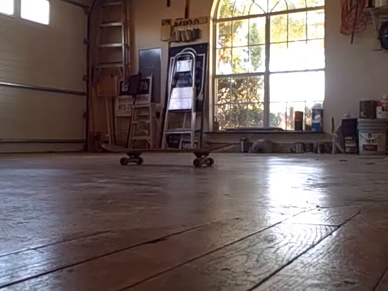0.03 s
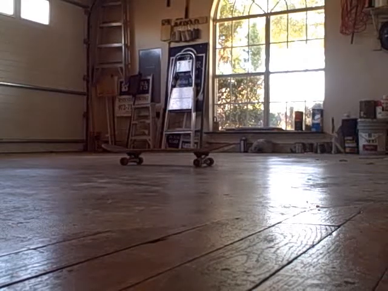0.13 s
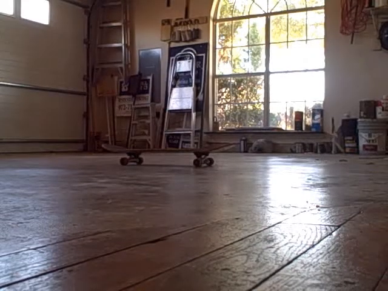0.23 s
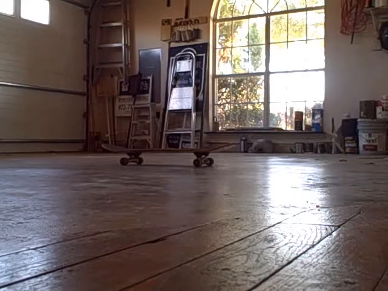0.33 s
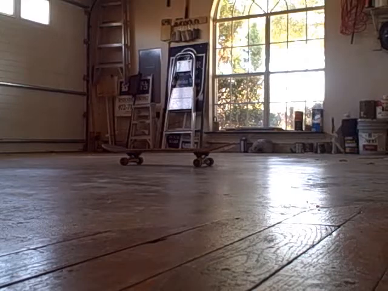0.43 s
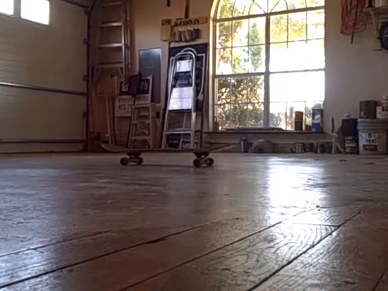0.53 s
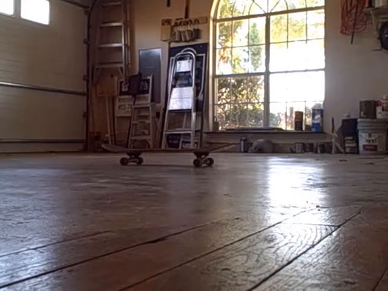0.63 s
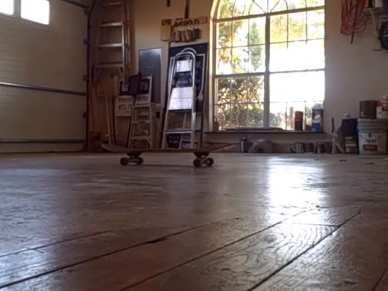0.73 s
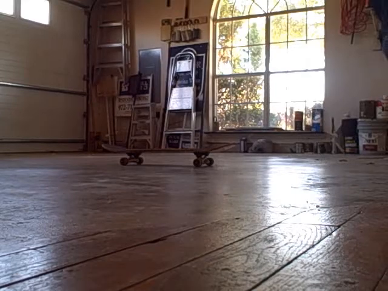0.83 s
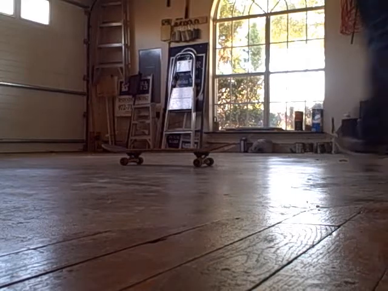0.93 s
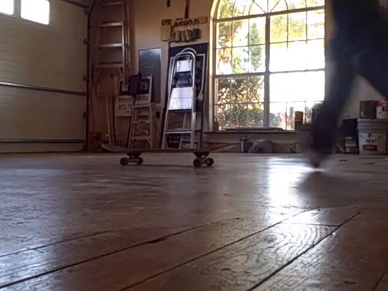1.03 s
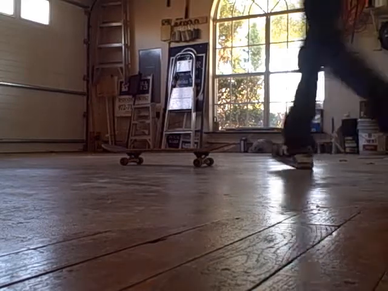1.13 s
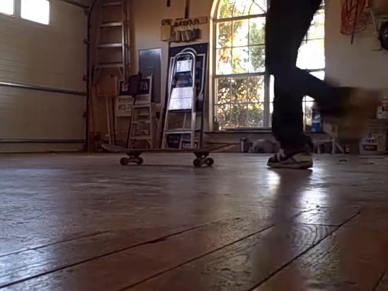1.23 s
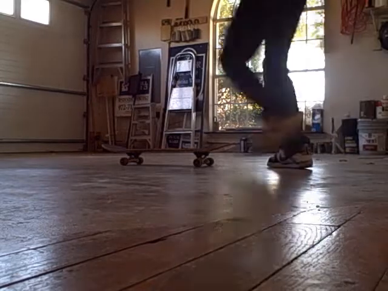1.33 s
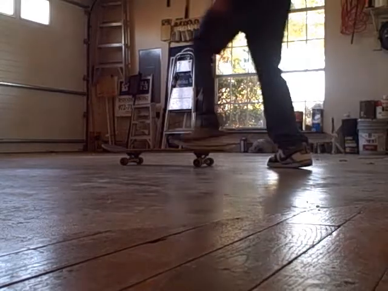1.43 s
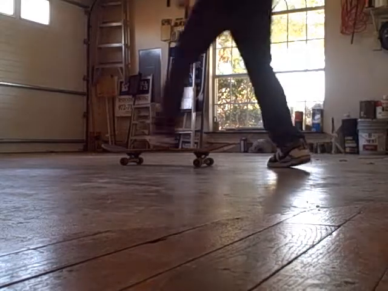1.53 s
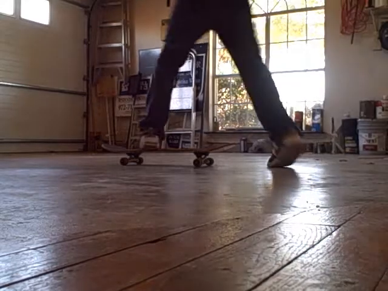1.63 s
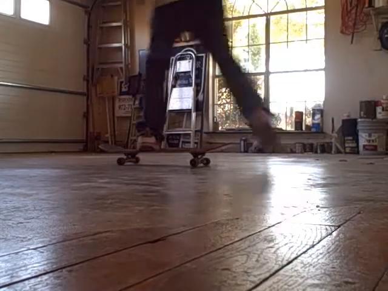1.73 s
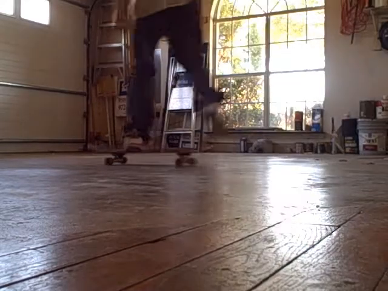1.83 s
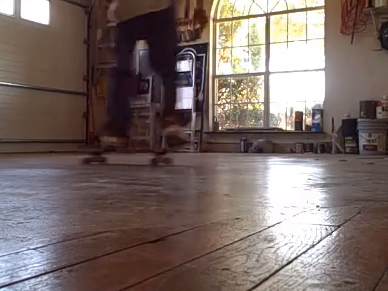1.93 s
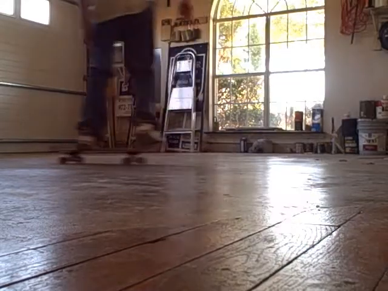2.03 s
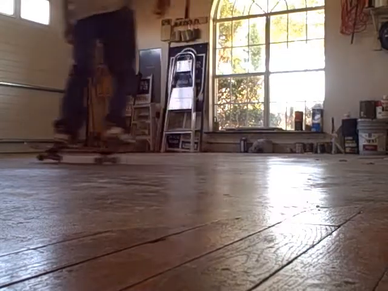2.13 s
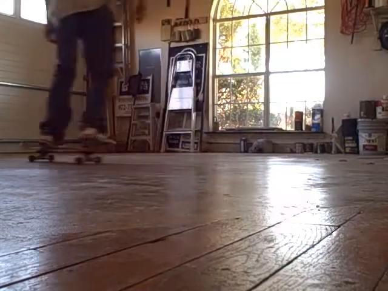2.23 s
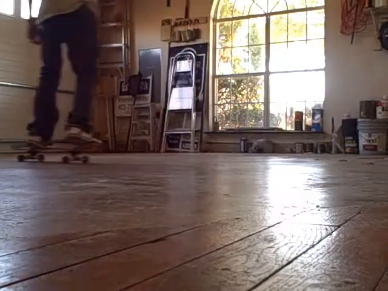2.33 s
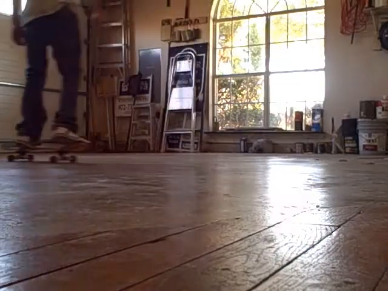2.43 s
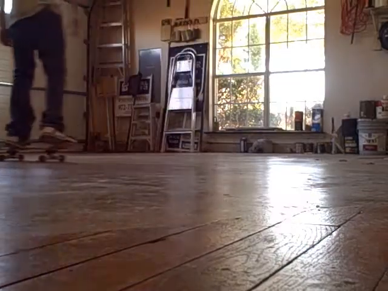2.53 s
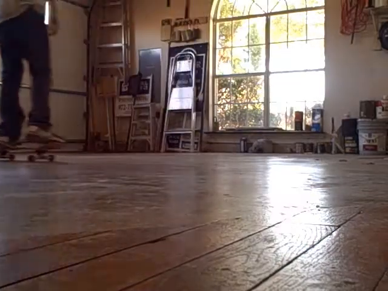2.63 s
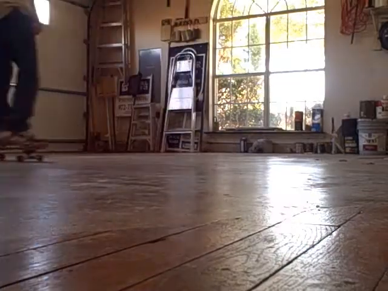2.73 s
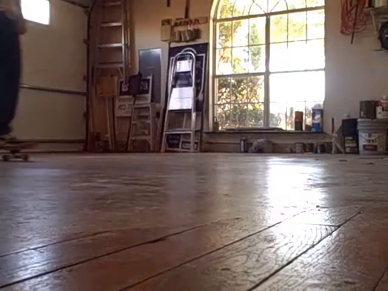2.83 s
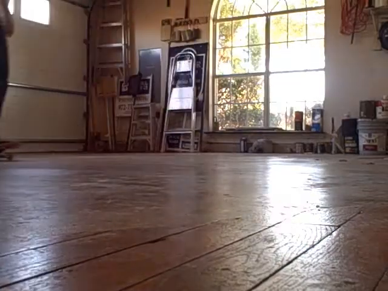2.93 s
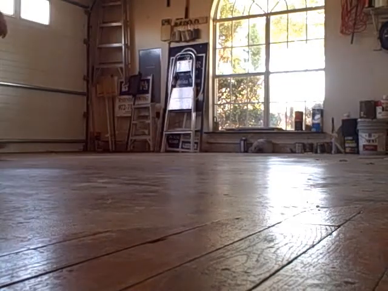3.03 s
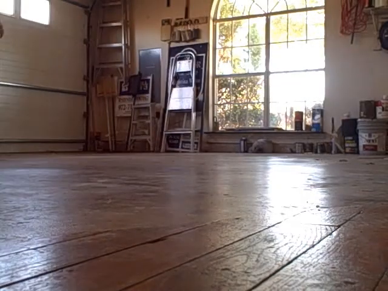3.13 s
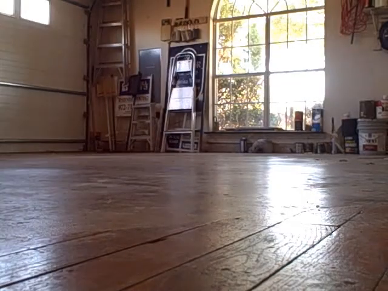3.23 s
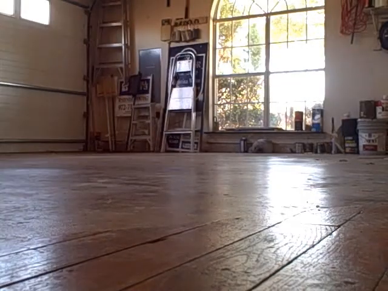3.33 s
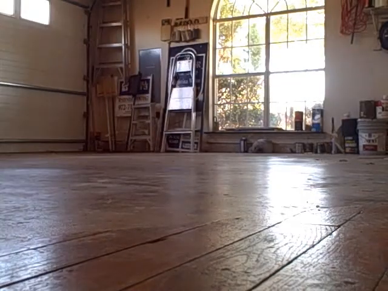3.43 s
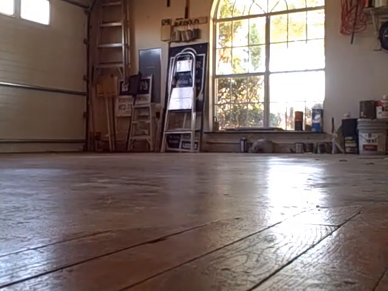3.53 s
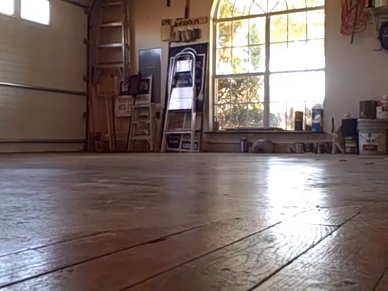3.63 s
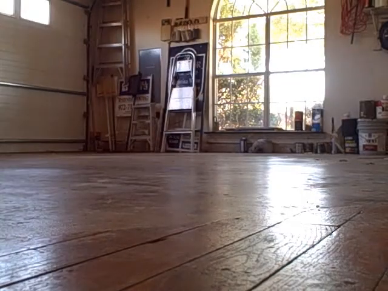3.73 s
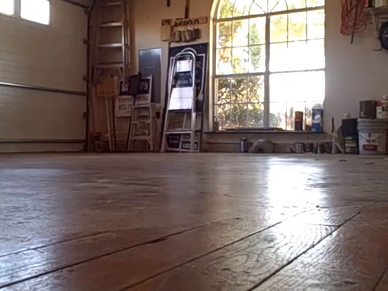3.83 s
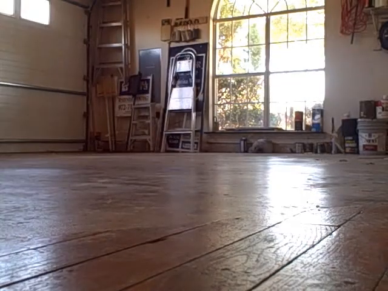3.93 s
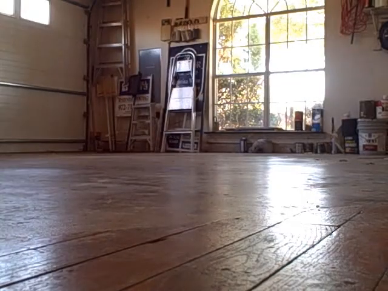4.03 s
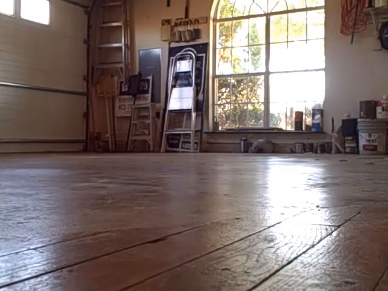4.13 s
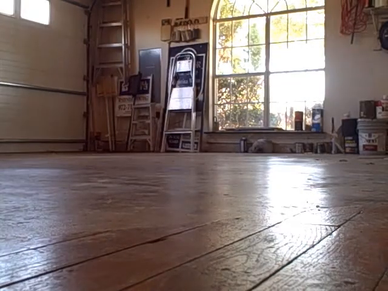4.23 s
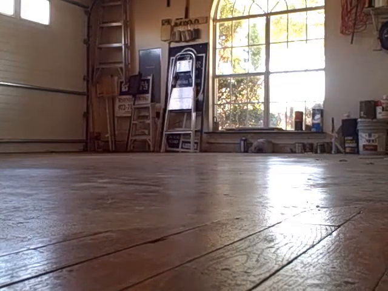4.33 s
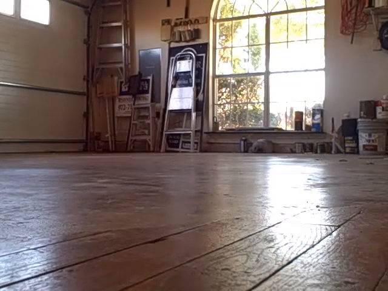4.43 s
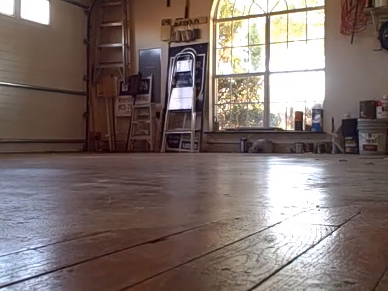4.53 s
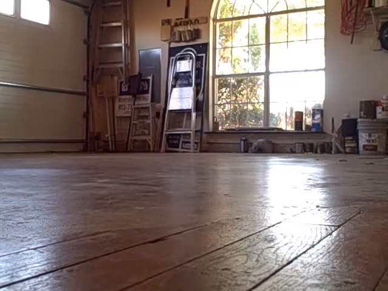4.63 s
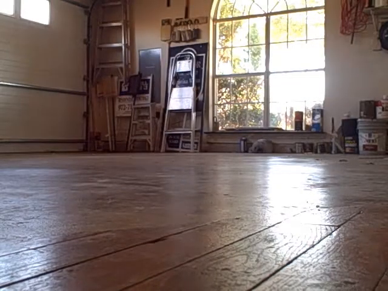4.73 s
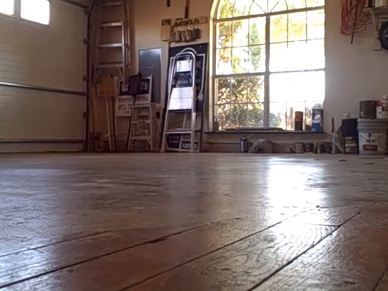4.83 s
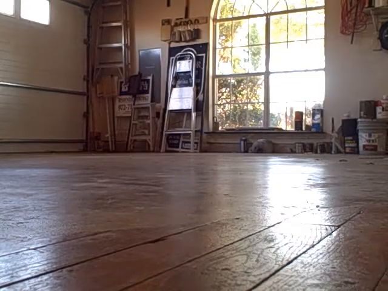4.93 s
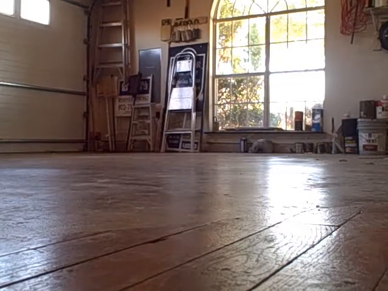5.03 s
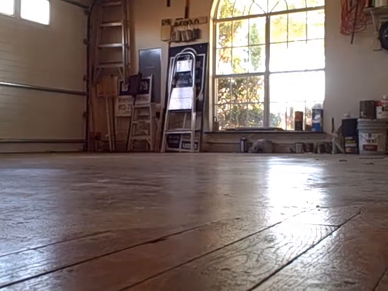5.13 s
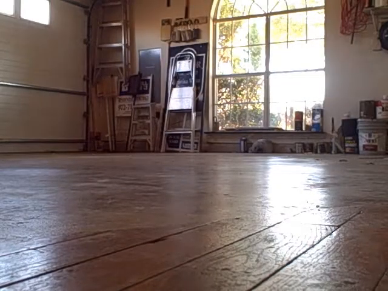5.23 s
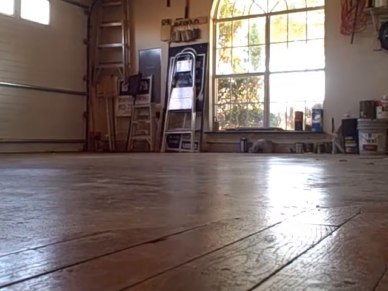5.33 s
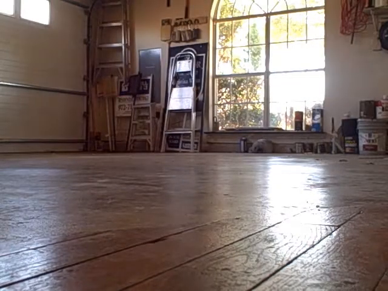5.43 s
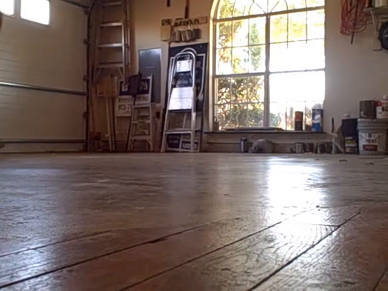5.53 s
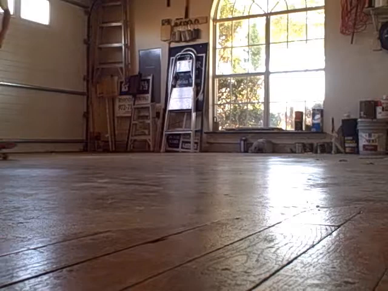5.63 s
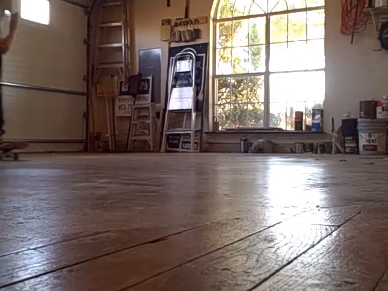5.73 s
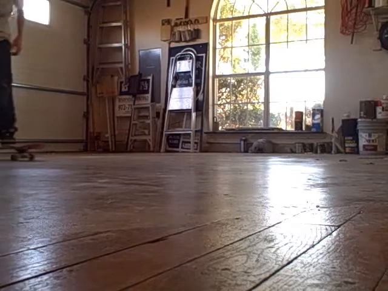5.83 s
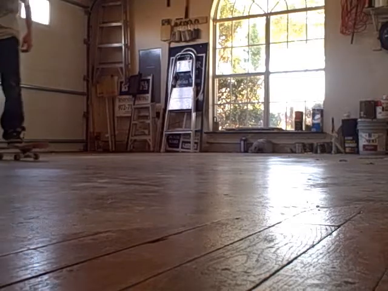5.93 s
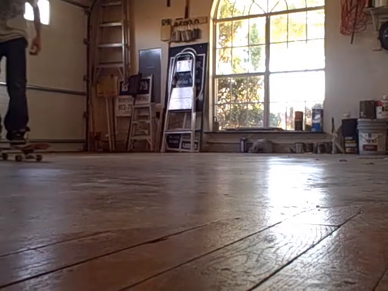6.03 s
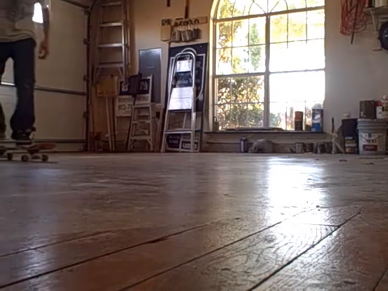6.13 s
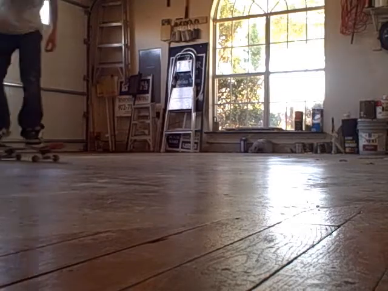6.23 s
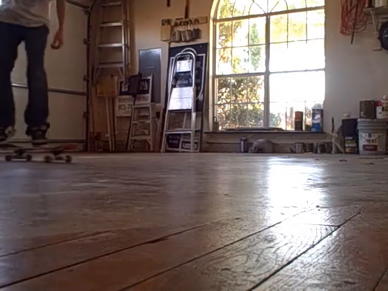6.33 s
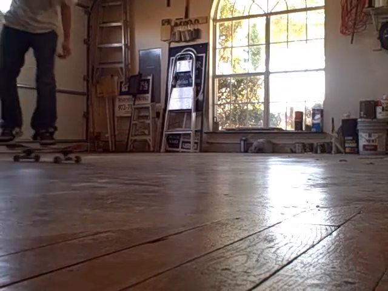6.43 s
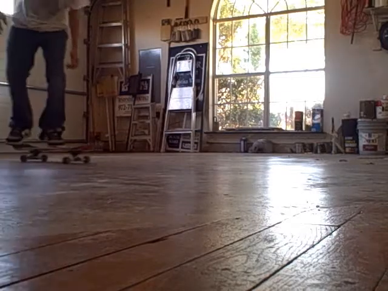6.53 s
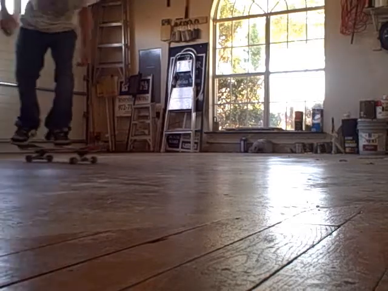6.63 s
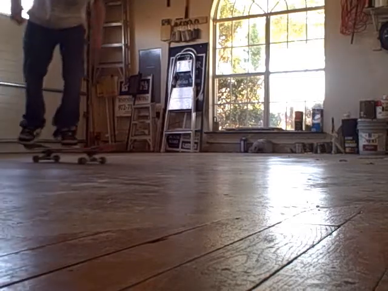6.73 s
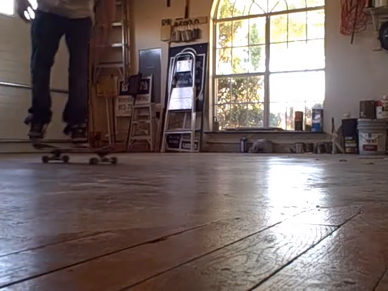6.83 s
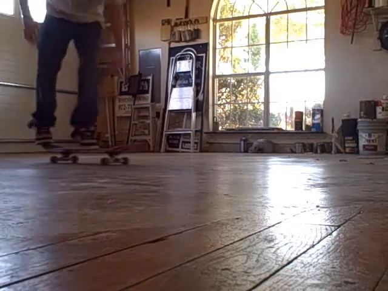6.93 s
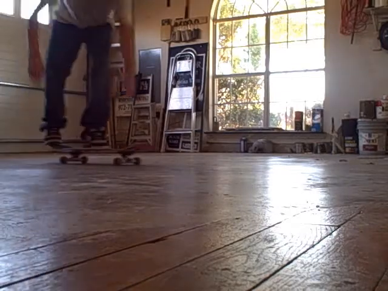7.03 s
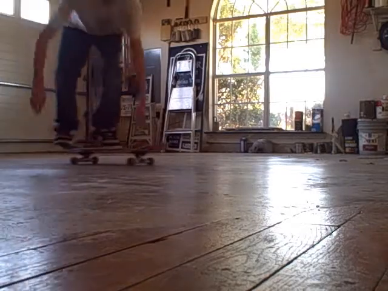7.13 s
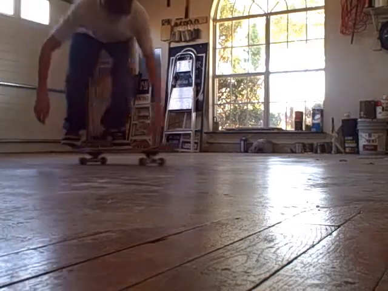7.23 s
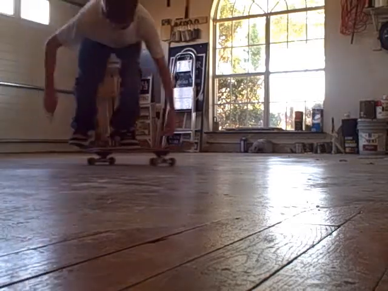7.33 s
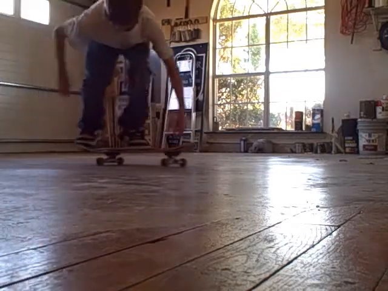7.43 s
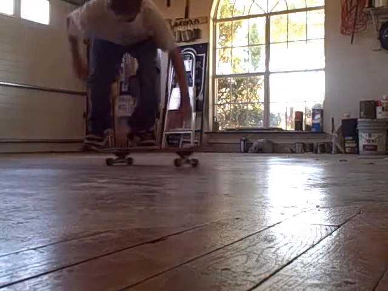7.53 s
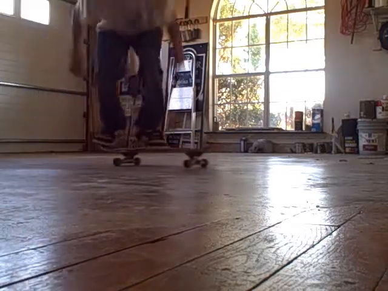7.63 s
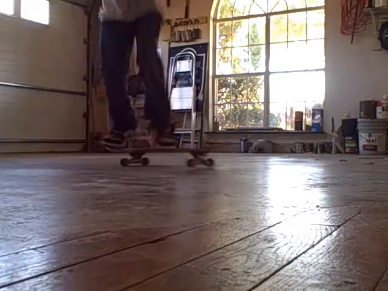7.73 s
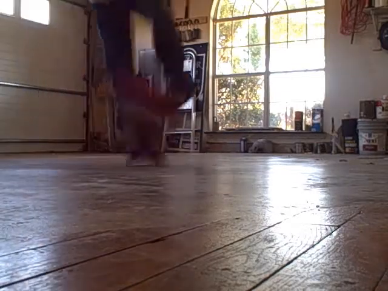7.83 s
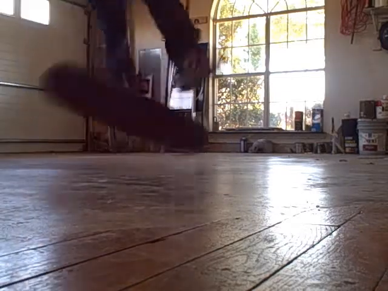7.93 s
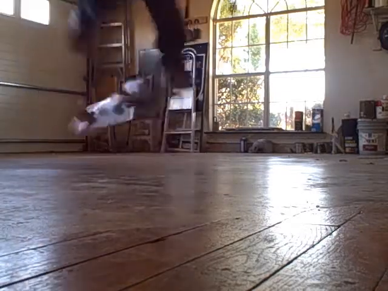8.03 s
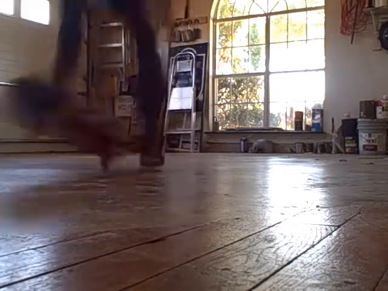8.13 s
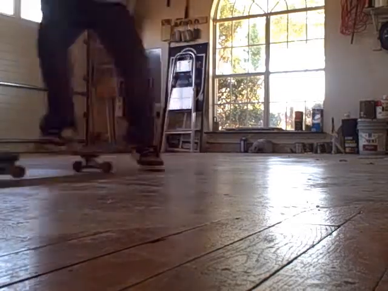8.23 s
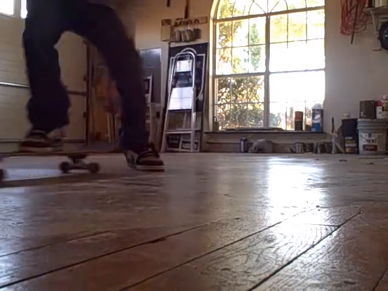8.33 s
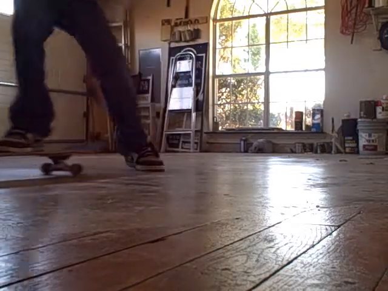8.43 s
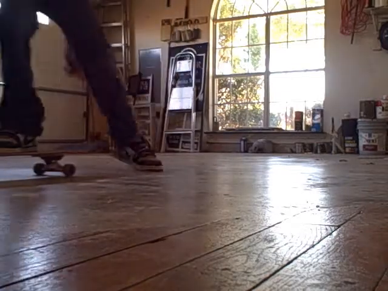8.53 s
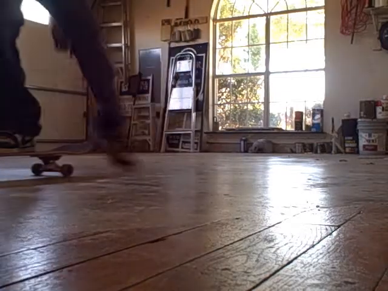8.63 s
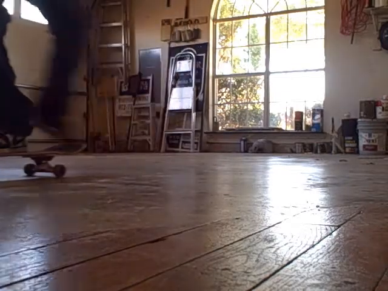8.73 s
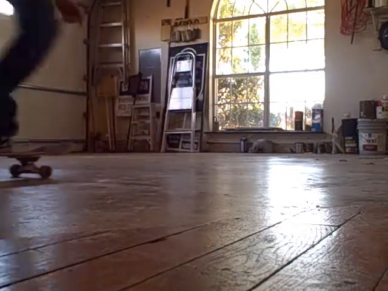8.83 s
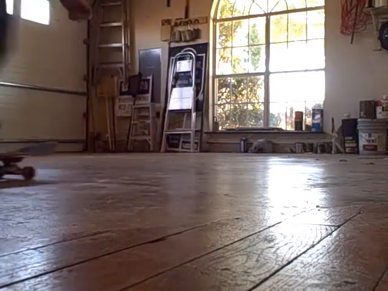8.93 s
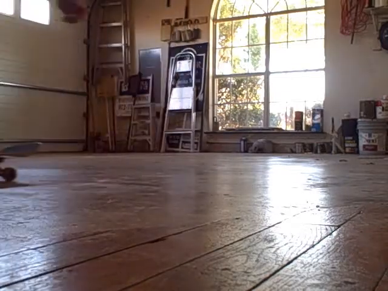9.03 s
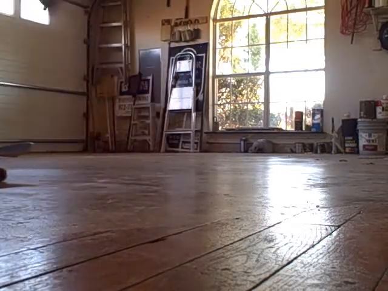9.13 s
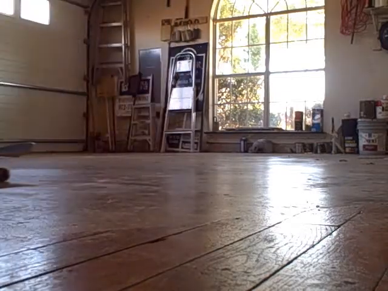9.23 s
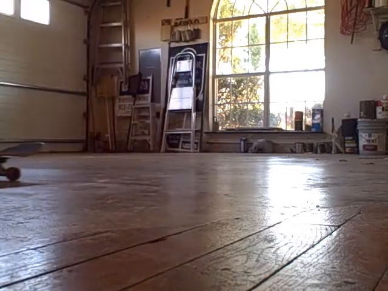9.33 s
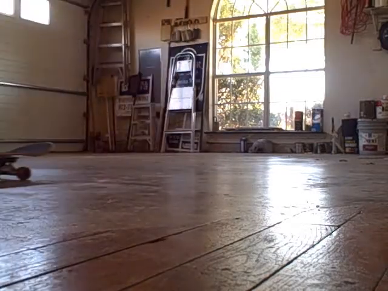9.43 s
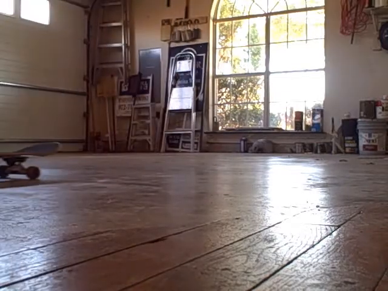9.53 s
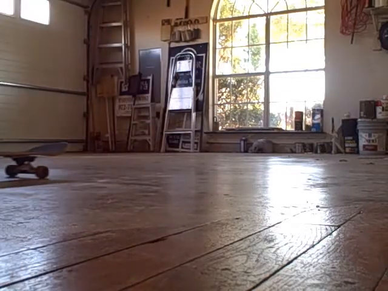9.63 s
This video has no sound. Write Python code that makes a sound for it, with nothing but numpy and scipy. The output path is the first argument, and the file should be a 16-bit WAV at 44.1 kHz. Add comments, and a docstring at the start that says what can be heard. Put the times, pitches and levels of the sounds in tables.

```python
"""Soft shoe steps and a faint engine outside, then a skateboard on the plank floor of an echoing garage.
The rider steps on, rolls away, turns with the wheels knocking down, rolls back and pops a flip.
Wood and steel are noise bursts through resonances and spectra; rolling is spiky noise with moving gains.
The deck rings as decaying sines, the engine is one sine. Blows pass through a synthetic echo.
The microphone lies on the boards; the pop and the landing overload it."""
import sys
import numpy as np
from scipy import signal
from scipy.fft import rfft, irfft, next_fast_len
from scipy.io import wavfile
from scipy.ndimage import map_coordinates

SR = 44100
rng = np.random.default_rng(int(sys.argv[2]) if len(sys.argv) > 2 else 0)


def store_pcm(level_fs):
    """Save levels as 16-bit WAV."""
    pcm = np.round(np.clip(level_fs, -1, 1) * 32767).astype(np.int16)
    wavfile.write(sys.argv[1], SR, np.atleast_2d(pcm).T)


N = 426888
TIME = np.arange(N) / SR
AGE = TIME[:2 ** 15]  # seconds since a contact
# Level columns are relative; each function trims them. Spectra give shape only.

# tail pop and landing blows: start_s, ring_db, boom_db, crack_db, crack_tilt_db_per_octave
CLACKS = [(7.9984, -11, -27.5, -13.5, 3.5), (8.279, -27, -47, -32, -6), (8.283, -34, -27, -27, 7),
          (8.2902, -5, -17, -12, -1), (8.299, -7, -20, -12.5, -6), (8.3657, -5.5, -22.5, -10, 1.5),
          (8.377, -9, -24, -15, -5)]
# modes of the deck and its trucks: pitch_hz, level_db, t60_s
DECK_MODES = [(307, -16.5, 0.19), (488.5, -16, 0.51), (540, -12, 0.21), (737.5, -5.5, 0.1),
              (810, -7.5, 0.13), (1080, -2, 0.054), (1297, -6, 0.082), (1400, -3.5, 0.06),
              (1620, 0.5, 0.052), (1614, -26.5, 1.26), (1684, -10.5, 0.09), (1945, -4, 0.055),
              (2136, -5, 0.031), (2432, -6.5, 0.045), (2850, -5, 0.021), (3000, -16, 0.042)]
# crack of the contact: freq_hz, level_db
CRACK_SPECTRUM = [(60, -40), (200, -12), (600, 3), (1500, 1.5), (2800, -0.5), (5000, -8.5), (9000, -11),
                  (10200, -21.5), (12500, -34), (13300, -64)]
# boom of the floor: freq_hz, level_db
BOOM_SPECTRUM = [(25, -24), (76, -10.5), (110, -17.5), (190, -5), (245, -2), (305, 3), (380, -2), (470, -3),
                 (650, -6), (1500, -47.5)]
# lowest mode of the sprung floor; level against the boom
FLOOR_HZ, FLOOR_DB, FLOOR_T60_S = 75, -21, 0.7


def deck_ring():
    """A struck deck rings in decaying sines; each blow finds the modes at other levels, pitches and signs."""
    ring = np.zeros(len(AGE))
    for pitch_hz, level_db, t60_s in DECK_MODES:
        level_shift, pitch_shift, polarity = rng.standard_normal(3)
        sine = np.sin(2 * np.pi * pitch_hz * (1 + 0.0082 * pitch_shift) * AGE)
        ring += amp(level_db + level_shift - 60 * AGE / t60_s) * sine * np.sign(polarity)
    return ring


def clacks():
    """Tail pop and landing: the deck rings, the contact cracks and the floor booms."""
    out = np.zeros(N)
    for start_s, ring_db, boom_db, crack_db, tilt_db in CLACKS:
        # bare wood cracks brightly, loaded wheels darkly
        tilted = [(hz, db + tilt_db * np.log2(np.clip(hz, 900, 3600))) for hz, db in CRACK_SPECTRUM]
        crack = blow(coloured(burst(0.042), tilted))
        boom = blow(coloured(burst(0.123), BOOM_SPECTRUM))
        contact = amp(crack_db) * crack + amp(boom_db) * boom
        floor = amp(boom_db + FLOOR_DB - 60 * AGE / FLOOR_T60_S) * np.sin(2 * np.pi * FLOOR_HZ * AGE)
        # the broad deck faces the microphone; the crack and the boom spread round the room
        add(out, start_s, amp(ring_db - 9) * garage(blow(deck_ring()), direct_db=5.5))
        add(out, start_s, garage(contact, direct_db=0.0))
        add(out, start_s, floor)
    return out


# bearings and truck hardware: pitch_hz, width_hz, level_db
METAL_MODES = [(7400, 900, -15), (9220, 92, 17), (9380, 50, 26), (10900, 300, -18)]
# bright rattle and hiss: freq_hz, level_db
RATTLE_SPECTRUM = [(1500, -15.5), (3800, 0), (5700, -4.5), (7200, 2), (9400, 1.5), (10200, -10),
                   (12500, -14), (13300, -20)]


def hardware(force, ring_db):
    """Steel bearings and loose trucks: a bright rattle with a few thin resonances."""
    rattle = unit(coloured(force, RATTLE_SPECTRUM))
    return rattle + amp(ring_db) * unit(resonant(force, METAL_MODES))


# wheels on planks: start_s, level_db, pitch_hz, boom_db, hardness_db, length_s, direct_db
# boom and hardness are against the knock; length is scaled for each layer
KNOCKS = [(1.884, -31, 660, -19, 0, 0.045, -5.5), (1.898, -24.5, 620, 0.5, -10, .045, -5.5),
          (2.043, -35, 690, 6, 5.5, 0.005, -8), (2.385, -27.5, 670, -6.5, 5.5, 0.0086, -7.5),
          (2.917, -46.5, 728, 2, 12, 0.043, -9), (3.363, -30.5, 665, -7, -5, 0.062, -8),
          (3.38, -25, 650, -0.5, -4.5, 0.068, -10), (3.6, -44.5, 635, 9, 6.5, 0.027, -9),
          (4.129, -35, 625, -14, -5.5, 0.097, -9), (4.498, -49.5, 440, 5.5, -2.5, 0.011, -0.5),
          (5.031, -56, 493, -4, -5, .02, 1), (5.496, -41, 630, 2, 5, .05, -10),
          (6.128, -18.5, 505, -7, 0.5, 0.053, -8), (7.018, -30.5, 640, -5, -1.5, 0.041, -8.5),
          (9.168, -35.5, 620, -8.5, -7.5, 0.062, -3.5), (9.543, -36.5, 622, -9.5, -6.5, 0.11, -6)]
# clatter of the wood: freq_hz, level_db
CLATTER_SPECTRUM = [(200, -43), (600, -4), (950, -3.5), (1120, -2), (1400, 1.5), (2000, -3.5), (2900, -5.5),
                    (4500, -14.5), (7000, -17), (13000, -80)]
RATTLE_DB, RATTLE_DB_PER_HARDNESS_DB = -11, 0.93


def knocks():
    """Wheels drop on planks: hollow knock and boom; harder contacts clatter and rattle more."""
    out = np.zeros(N)
    for start_s, level_db, pitch_hz, boom_db, hardness_db, length_s, direct_db in KNOCKS:
        plank = [(pitch_hz, 300, 0)]
        hollow = blow(resonant(resonant(burst(3.4 * length_s), plank), plank))
        boom = blow(coloured(burst(3.6 * length_s), BOOM_SPECTRUM))
        clatter = blow(coloured(burst(2.2 * length_s), CLATTER_SPECTRUM))
        rattle = blow(hardware(burst(length_s), ring_db=-22))
        wood = hollow + amp(boom_db) * boom + amp(hardness_db) * clatter
        rattle_db = level_db + RATTLE_DB + RATTLE_DB_PER_HARDNESS_DB * hardness_db
        add(out, start_s, amp(level_db - 4.0) * garage(wood, direct_db))
        add(out, start_s, amp(rattle_db) * garage(rattle, direct_db + 3.5))
    return out


# wheel rumble, rider rolling away: time_s, level_db
ROLL_AWAY = [(1.75, -54), (1.83, -35.5), (2.0, -30), (2.75, -38.5), (3.08, -31), (3.55, -37.5), (3.7, -51),
             (4.4, -56), (4.6, -81)]
# wheel rumble, rider rolling back: time_s, level_db
ROLL_BACK = [(5.05, -54), (5.12, -52), (5.43, -39.5), (5.65, -36.5), (6.48, -33), (6.68, -44.5),
             (7.18, -40), (7.929, -46.5)]
# wheel rumble, riderless board: time_s, level_db
ROLL_OFF = [(8.9, -45), (9.68, -50.5)]


def riding():
    """Gain of the rumble over the three runs; zero outside them."""
    gain = np.zeros(N)
    for run in (ROLL_AWAY, ROLL_BACK, ROLL_OFF):
        time_s, level_db = np.transpose(run)
        rolling_now = (TIME > time_s[0]) & (TIME < time_s[-1])
        gain += amp(np.interp(TIME, time_s, level_db)) * rolling_now
    return gain


# the rider leans and the loaded wheels scrub (last row: riderless): peak_s, hiss_db
SWERVES = [(2.2, -40), (2.98, -39), (3.55, -42.5), (5.11, -48), (5.21, -48.5), (5.53, -40), (5.75, -35),
           (5.99, -38), (6.491, -32), (7.0, -36), (9.09, -49.5)]
SWERVE_RISE_S, SWERVE_FALL_S = 0.13, 0.11  # per 20 dB
SWERVE_RUMBLE_DB = 8  # rumble gain over the scrub
HISS_DB = -13.5  # bearing hiss gain against the rumble, off the swerves
# rumble of the wheels: freq_hz, level_db
RUMBLE_SPECTRUM = [(30, -34), (100, -10), (160, -4.5), (190, -1.5), (225, -6.5), (400, -2), (550, 0),
                   (770, 0.5), (1080, -8.5), (1450, -6), (2300, -9.5), (3600, -18.5), (6000, -29),
                   (13000, -36.5)]


def bumps(spiky_db):
    """Plank grain under the wheels: noise whose level jumps, so a few bumps are larger."""
    return rng.standard_normal(N) * amp(spiky_db * wobble(400))


def rolling():
    """Wheels ride over plank grain: rumble, hiss and a singing bearing; swerves are louder and brighter."""
    ride = riding()
    scrub = sum(swell(peak_s, db, SWERVE_RISE_S, SWERVE_FALL_S) for peak_s, db in SWERVES)
    rumble_gain = np.hypot(ride, amp(SWERVE_RUMBLE_DB) * scrub)
    hiss_gain = np.hypot(amp(HISS_DB) * ride, scrub)
    uneven = amp(0.9 * wobble(12) + 1.8 * wobble(45))
    rumble = rumble_gain * uneven * unit(coloured(bumps(spiky_db=5), RUMBLE_SPECTRUM))
    hiss = amp(-0.5) * hiss_gain * uneven * unit(coloured(bumps(spiky_db=7), RATTLE_SPECTRUM))
    # a dry bearing sings in short fits, relatively stronger as the hiss grows, up to a cap
    fits = amp(5 * wobble(9))
    singing_gain = hiss_gain * np.minimum(amp(-12.5), amp(39) * hiss_gain)
    singing = singing_gain * fits * unit(resonant(bumps(spiky_db=1), METAL_MODES[1:2]))
    return amp(-5.0) * garage(rumble + hiss + singing, direct_db=-3.0)[:N]


# grit clicks under a wheel, or a loose truck clicks: start_s, level_db
TICKS = [(2.825, -34), (4.1802, -40), (4.5, -40), (7.2453, -35), (7.8265, -37), (9.171, -32.5),
         (9.552, -31)]
GRIT_PER_S, GRIT_DB, GRIT_SCATTER_DB = 4.3, -43.5, 2.5  # levels on the scale of TICKS


def ticks():
    """Tiny hard contacts in the wheels: a few clear ones, and fainter grit at random in the ridden runs."""
    clicks = list(TICKS)
    for run in (ROLL_AWAY, ROLL_BACK):
        begin_s, end_s = run[0][0], run[-1][0]
        for _ in range(round(GRIT_PER_S * (end_s - begin_s))):
            level_db = GRIT_DB + GRIT_SCATTER_DB * rng.standard_normal()
            clicks.append((rng.uniform(begin_s, end_s), level_db))
    out = np.zeros(N)
    for start_s, level_db in clicks:
        click = blow(hardware(burst(0.021), ring_db=-6.0))
        add(out, start_s, amp(level_db - 21.5) * garage(click, direct_db=0.5))
    return out


# shoes tread and scuff: start_s, thud_db, scuff_db, scuff_length_s
STEPS = [(0.002, -30.5, -44, 0.22), (0.382, -38.5, -46.5, 0.0031), (0.416, -37, -49.5, 0.0061),
         (0.447, -45, -63, .06), (0.702, -46, -47, 0.67), (1.203, -59, -54, 0.86),
         (1.349, -48.5, -73, 0.073), (1.669, -58, -57.5, 0.23), (9.04, -47, -60, 0.12)]
# thud of a sole: freq_hz, level_db
THUD_SPECTRUM = [(25, -3), (100, -3.5), (180, -3), (350, -2), (600, -6.5), (900, -13.5), (2000, -23.5),
                 (6000, -53)]
# scuff of a sole: freq_hz, level_db
SCUFF_SPECTRUM = [(200, -8.5), (900, 0.5), (1300, -6), (1850, 1), (2800, -3), (4400, -6), (6000, -9.5),
                  (9200, -8), (10500, -26), (13000, -37)]
# soles rub the grip tape, stepping on and in the flip: peak_s, level_db, rise_s, fall_s (per 20 dB)
DRAGS = [(1.81, -45, 0.075, 0.13), (8.005, -25.5, 0.071, 0.061)]
# cloth swishes in the first stride: peak_s, level_db, rise_s, fall_s (per 20 dB)
SWISHES = [(.56, -46.5, 0.45, .2), (.87, -60, 0.23, .8)]
# cloth resonances: pitch_hz, width_hz, level_db
CLOTH_MODES = [(1800, 460, 2), (4120, 350, -10)]


def shoes():
    """Soft soles thud and scuff as bursts; trouser swishes and sole drags are swelling friction noise."""
    out = np.zeros(N)
    for start_s, thud_db, scuff_db, scuff_length_s in STEPS:
        thud = blow(coloured(burst(0.084), THUD_SPECTRUM))
        scuff = blow(coloured(burst(scuff_length_s), SCUFF_SPECTRUM))
        step = amp(thud_db) * thud + amp(scuff_db) * scuff
        add(out, start_s, garage(step, direct_db=-4.5))
    drags = amp(9.5) * coloured(rub(DRAGS), SCUFF_SPECTRUM)
    swishes = amp(10.5) * resonant(rub(SWISHES), CLOTH_MODES)
    return out + garage(drags + swishes, direct_db=-2.0)[:N]


ENGINE_START_HZ, ENGINE_TOP_HZ, ENGINE_SPEEDUP_S = 54, 77, 1.8  # firing rate, time constant
ENGINE_DB, ENGINE_LEAVES_S, ENGINE_FADE_DB_PER_S = -51, 1.03, 5


def engine():
    """A far engine: a sine at the firing rate, which gathers speed and fades."""
    firing_hz = ENGINE_TOP_HZ + (ENGINE_START_HZ - ENGINE_TOP_HZ) * np.exp(-TIME / ENGINE_SPEEDUP_S)
    level_db = ENGINE_DB - ENGINE_FADE_DB_PER_S * np.maximum(TIME - ENGINE_LEAVES_S, 0)
    hum = unit(np.sin(2 * np.pi * np.cumsum(firing_hz) / SR))
    return amp(level_db + 0.6 * wobble(5)) * hum


# a deep drone comes and goes: peak_s, level_db, rise_s, fall_s (per 20 dB)
DRONES = [(.6, -52, 8, 4.7), (4.3, -57, 0.4, 1.9)]


def drone():
    """Noise through one narrow low resonance, twice."""
    narrow = [(51.2, 16, 0)]
    tone = unit(resonant(resonant(rng.standard_normal(N), narrow), narrow))
    return sum(swell(*row) for row in DRONES) * tone


# still air: freq_hz, level_db
AIR_SPECTRUM = [(20, -8), (50, -8), (100, -9.5), (240, -12.5), (400, -17), (750, -20), (1100, -25.5),
                (1900, -25), (4500, -31), (9200, -29.5), (10500, -40), (12600, -45), (13300, -25.5)]


def still_air():
    """Steady coloured noise of the quiet garage."""
    return amp(-53.5) * unit(coloured(rng.standard_normal(N), AIR_SPECTRUM))


# echo decay: freq_hz, t60_s
GARAGE_DECAY = [(80, 0.3), (260, 1), (700, 1.06), (1800, 0.95), (4800, 0.84), (9000, 0.55), (13000, 0.76)]


def garage(x, direct_db):
    """The direct sound plus the echo of bare walls, which builds up within milliseconds."""
    hz, t, z = signal.stft(rng.standard_normal(SR + SR // 4), SR, nperseg=256)
    decay = amp(-60 * t / along(GARAGE_DECAY, hz)[:, None])
    tail = signal.istft(z * decay, SR, nperseg=256)[1]
    tail *= 1 - np.exp(-TIME[:len(tail)] / 0.0013)
    tail /= np.linalg.norm(tail)
    tail[0] = amp(direct_db)
    return signal.fftconvolve(x, tail)


def burst(decay_s):
    """The chattering force of one contact: fading noise, repeatedly flattened over frequency."""
    fade = amp(-60 * AGE / max(decay_s, 0.001))
    force = rng.standard_normal(len(AGE)) * fade
    for _ in range(3):
        flat = irfft(np.exp(1j * np.angle(rfft(force))))
        force = flat * np.sqrt(fade)
    return force


def rub(strokes):
    """Friction noise that swells and dies with each stroke."""
    return rng.standard_normal(N) * sum(swell(*row) for row in strokes)


def swell(peak_s, level_db, rise_s, fall_s):
    """A gain that climbs 20 dB in rise_s up to its peak and loses 20 dB in fall_s after it."""
    return amp(level_db - 20 * np.maximum((peak_s - TIME) / rise_s, (TIME - peak_s) / fall_s))


def wobble(rate_hz):
    """A smooth random curve with rate_hz knots a second."""
    knots = rng.standard_normal(int(N * rate_hz / SR) + 4)
    return map_coordinates(knots, [TIME * rate_hz])


def resonant(x, modes):
    """x through parallel resonances (pitch_hz, width_hz, level_db)."""
    def response(f):
        return sum(amp(db) * 1j * f * w / (c * c - f * f + 1j * f * w) for c, w, db in modes)
    return filtered(x, response)


def coloured(x, spectrum):
    """Causal minimum-phase filter with the given (freq_hz, level_db) shape."""
    def response(hz):
        cepstrum = irfft(np.log(amp(along(spectrum, hz))))
        cepstrum[1:len(hz) - 1] *= 2
        cepstrum[len(hz):] = 0
        return np.exp(rfft(cepstrum))
    return filtered(x, response)


def filtered(x, response):
    """x times a complex response of frequency."""
    m = 2 * next_fast_len(len(x) // 2 + 4096)
    return irfft(rfft(x, m) * response(np.fft.rfftfreq(m, 1 / SR)), m)[:len(x)]


def along(points, hz):
    """Read (freq_hz, value) points on a log axis."""
    f, v = np.transpose(points)
    return np.interp(np.log(hz + 1), np.log(f + 1), v)


def amp(db):
    """Decibels to gain."""
    return 10 ** (np.asarray(db) / 20)


def unit(x):
    """Scale to rms 1."""
    return x / np.sqrt(np.mean(x ** 2) + 1e-20)


def blow(x):
    """Scale to the energy of 65 ms at rms 1."""
    return x * np.sqrt(0.065 * SR / (np.sum(x ** 2) + 1e-20))


def add(track, start_s, x):
    """Mix x into the track at start_s."""
    part = track[max(round(start_s * SR), 0):][:len(x)]
    part += x[:len(part)]


def scene():
    """Everything meets at one microphone."""
    board = clacks() + knocks() + rolling() + ticks()
    background = engine() + drone() + still_air()
    return (board + shoes() + background)[None]


TOP_HZ = 15800  # middle of the final cutoff


def record(dry):
    """The microphone loses treble above 12.6 kHz, clips softly on the loudest blows and is band-limited."""
    heard = filtered(dry[0], lambda hz: amp(-40 * np.clip((hz - 12600) / 600, 0, 1)))
    clipped = heard / (1 + np.abs(heard) ** 8) ** (1 / 8)
    band = [(12500, 0), (13300, -4), (TOP_HZ - 400, -6), (TOP_HZ + 400, -80)]
    return filtered(clipped, lambda hz: amp(along(band, hz)))[None]


dry = scene()
out = record(dry)
store_pcm(out)
```